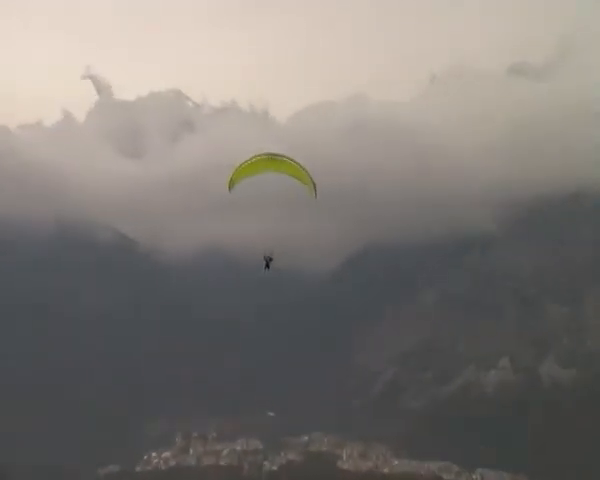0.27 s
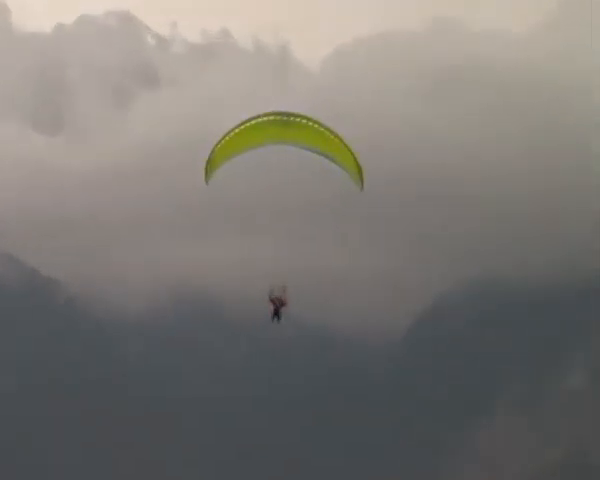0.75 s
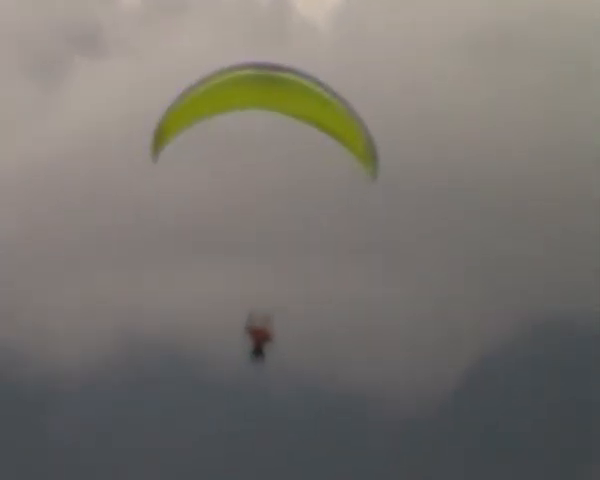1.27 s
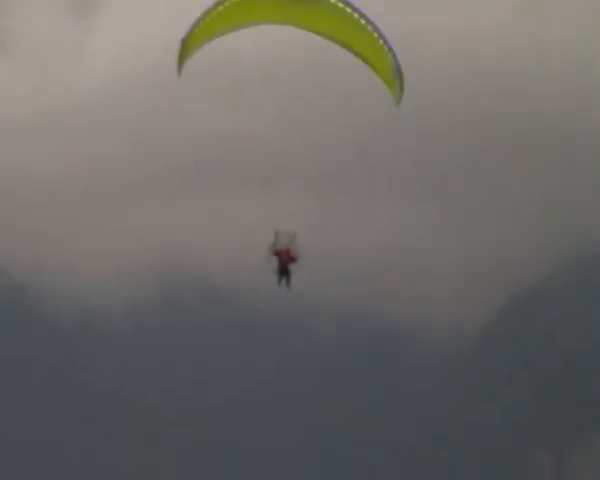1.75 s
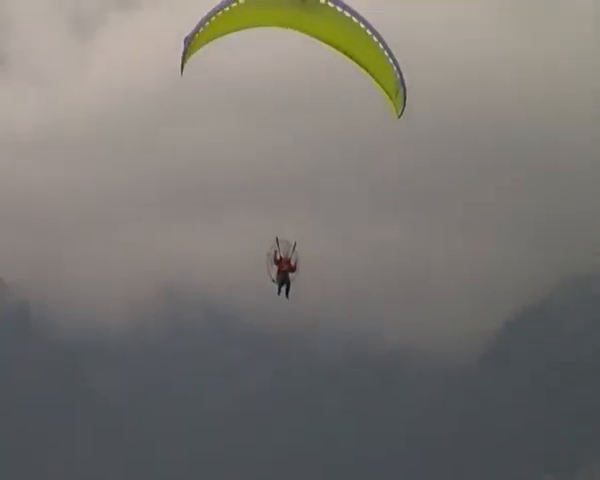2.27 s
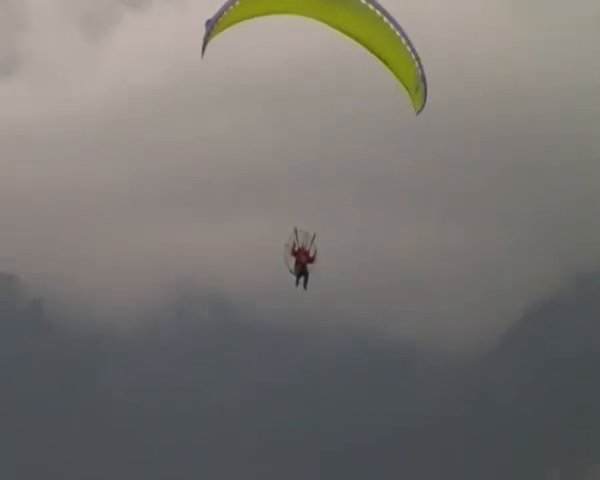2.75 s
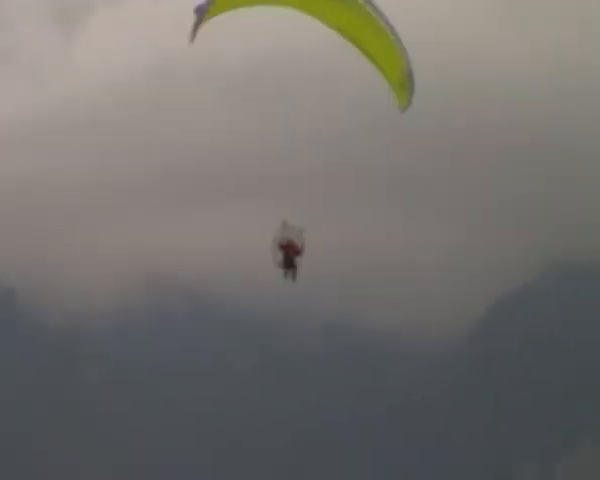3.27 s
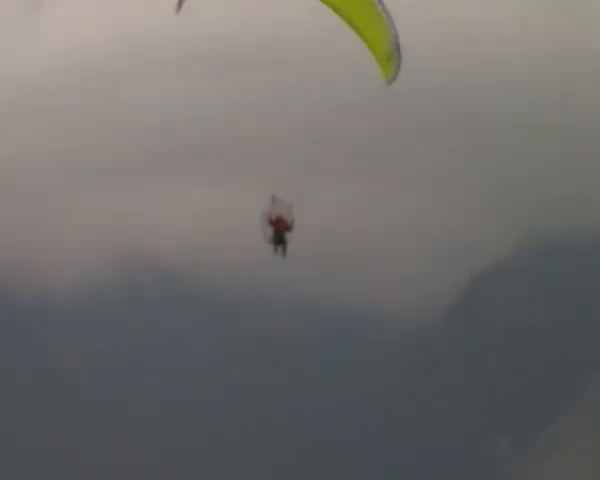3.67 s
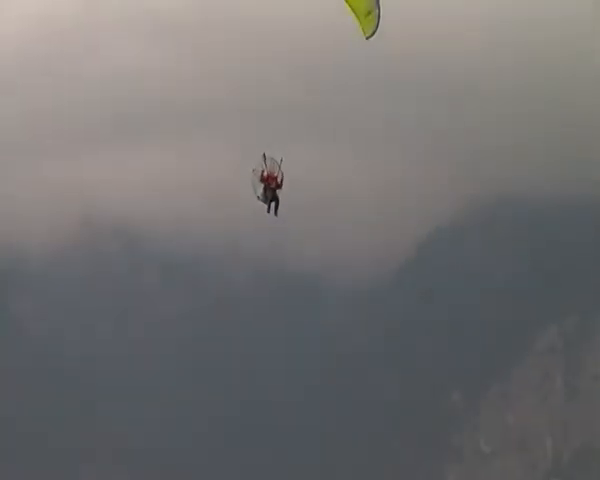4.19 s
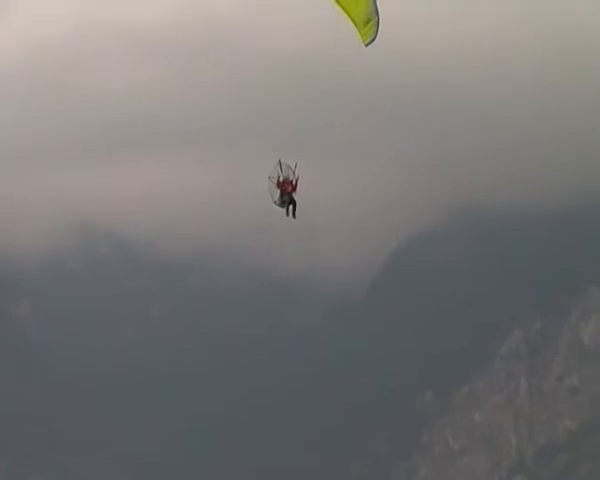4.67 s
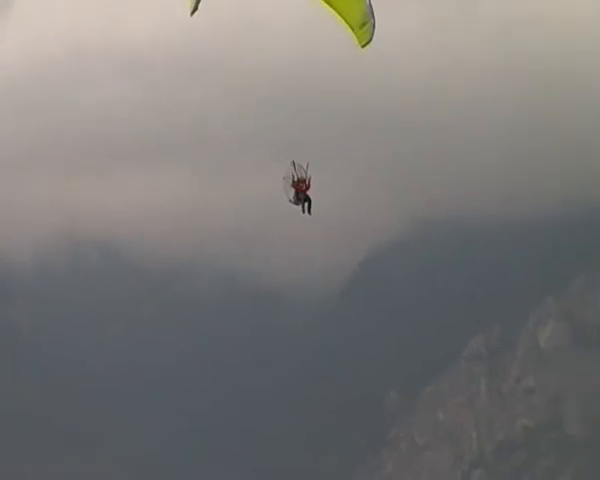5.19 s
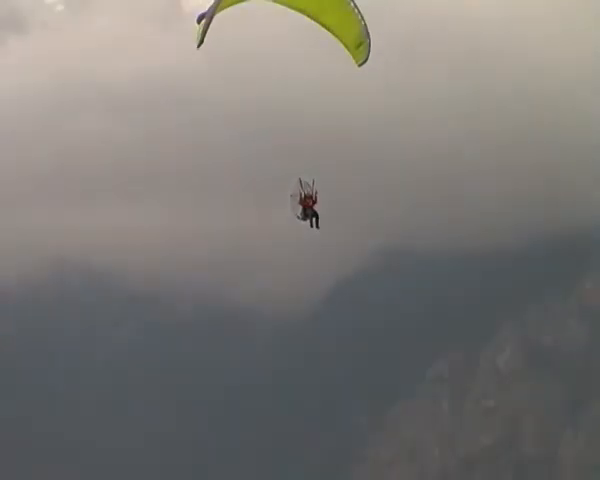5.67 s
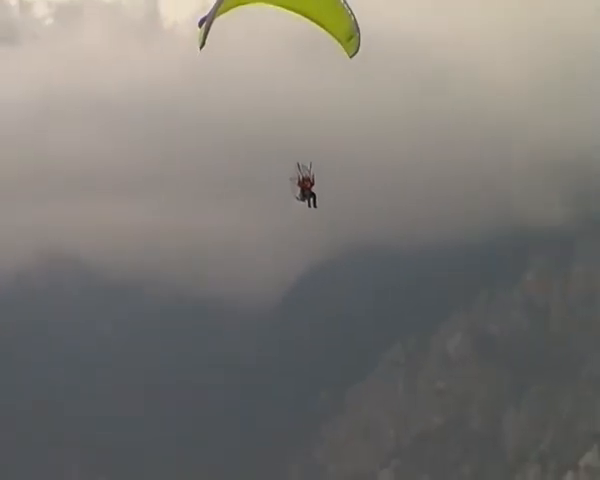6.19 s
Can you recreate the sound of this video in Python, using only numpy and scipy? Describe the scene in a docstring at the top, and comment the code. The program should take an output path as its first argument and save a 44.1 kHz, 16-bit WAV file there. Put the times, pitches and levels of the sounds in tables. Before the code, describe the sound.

Wind rumbles and ticks on a microphone as a paramotor's raspy engine drone approaches, surges loud, drops back and slowly sinks in pitch.

```python
"""On an open beach a paramotor flies towards and over two microphone ports, its pitch sinking slowly.
One pressure pulse per firing rings the two-stroke's silencer into a buzz and knocks its shell.
The geared propeller hums with thrust and rasps as its blades chop the wakes of pilot and frame.
Moving air makes the aircraft swell and fade; wind buffets the ports over the wash of the beach."""
import sys
import numpy as np
from scipy import signal
from scipy.fft import rfft, irfft, next_fast_len
from scipy.io import wavfile

SR = 44100
rng = np.random.default_rng(int(sys.argv[2]) if len(sys.argv) > 2 else 0)


def to_wav(s):
    """Save 16-bit WAV."""
    ch = np.atleast_2d(s).T  # columns
    pcm = np.round(np.clip(ch, -1, 1) * 32767)  # PCM
    wavfile.write(sys.argv[1], SR, pcm.astype(np.int16))


N = 283563  # samples
TOP_HZ = 10900  # upper limit of the microphone's band


def amp(db):
    """Decibels to gain."""
    return 10 ** (np.asarray(db) / 20)


def unit(x):
    """Scale to rms 1."""
    return x / np.sqrt(np.mean(x ** 2) + 1e-20)


def curves(rows):
    """One value per sample for each column after the time."""
    s, *columns = np.transpose(rows)
    t = np.arange(N) / SR
    return [np.interp(t, s, column) for column in columns]


def wobble(rate):
    """A random curve of rms 1 with rate knots a second."""
    knots = rng.standard_normal(int(N * rate / SR) + 2)
    return unit(np.interp(np.arange(N) * rate / SR, np.arange(len(knots)), knots))


def filtered(x, response):
    """x passed through a complex response of frequency, padded so that tails do not wrap round."""
    m = next_fast_len(N + 8192)
    return irfft(rfft(x, m) * response(np.fft.rfftfreq(m, 1 / SR)), m)[..., :N]


def coloured(x, spectrum):
    """x shaped by (freq_hz, level_db) points on a log frequency axis, at rms 1."""
    f, db = np.transpose(spectrum)
    return unit(filtered(x, lambda hz: amp(np.interp(np.log(hz + 1), np.log(f), db))))


def clicks(turns):
    """One click at every whole turn."""
    whole = np.floor(turns)
    return np.diff(whole, prepend=whole[0])


def struck(hits, spectrum, sweep_s):
    """Clicks ringing with a (freq_hz, level_db) spectrum, at rms 1; the highest treble trails by sweep_s."""
    f, db = np.transpose(spectrum)

    def response(hz):
        shape = np.log(amp(np.interp(np.log(hz + 1), np.log(f), db)))
        # the phase that lets the ring start at the click, never before it
        causal = np.conj(signal.hilbert(np.r_[shape, shape[-2:0:-1]]))[:len(hz)]
        return np.exp(causal - 1j * np.pi * sweep_s * hz ** 2 / TOP_HZ)
    return unit(filtered(hits, response))


# the wash of the beach: freq_hz, level_db (relative, per Hz)
SHORE_SPECTRUM = [(25, -8), (70, -1.5), (140, 8), (300, -3.5), (600, -0.5), (1500, -28), (4000, -31),
                  (7000, -29), (11000, -43)]


def shore(level_db):
    """The soft wash of the open beach: shaped noise, separate at each port, drifting slightly in level."""
    return amp(level_db + wobble(3.5)) * coloured(rng.standard_normal((2, N)), SHORE_SPECTRUM)


# the light breeze between gusts: time_s, level_db (relative, both ports together)
BREEZE_LEVEL = [(0, -39.5), (0.2, -35.5), (0.3, -35), (0.7, -37), (0.9, -35), (1.15, -44), (2.35, -42.5),
                (2.5, -55.5), (2.9, -43), (3.12, -39.5), (3.7, -37.5), (4.1, -37), (4.5, -36), (5.1, -38.5),
                (5.4, -38.5), (6.43, -38)]
BREEZE_LEFT_DB = 2  # lean to the left port
BREEZE_SWING_DB, BREEZE_SWINGS_PER_S = 3.5, 18  # depth and pace of its puffs
# moments when the breeze drops: middle_s
LULL_TIMES = [0.0, 0.191, 1.095, 1.185, 1.295, 1.425, 1.73, 3.135, 3.535, 3.785, 3.925]
LULL_DB, LULL_S = -8, 0.048  # depth and length of a lull
# gusts that swell and die: middle_s, length_s, peak_db (relative), left_minus_right_db
GUST_EVENTS = [(0.334, 0.02, -29.5, -6), (0.374, 0.026, -27.5, 18.5), (0.417, 0.019, -26.5, -8),
               (0.462, .05, -33, 5), (0.534, 0.035, -28, 18), (0.669, 0.076, -29.5, 5.5),
               (0.786, 0.04, -30.5, -0.5), (0.868, 0.041, -32, 5), (1.05, .04, -31, 10),
               (1.153, 0.022, -31, 2), (1.24, 0.036, -29, 1.5), (1.368, .06, -33, 7.5),
               (1.585, 0.18, -29, 12), (1.81, 0.044, -31.5, 17), (1.966, 0.055, -42, 12),
               (2.131, 0.041, -34.5, 6), (3.293, 0.24, -35.5, 9), (2.082, 0.092, -35, -13.5),
               (2.31, 0.21, -37, 17.5), (3.466, 0.046, -29, 1.5), (3.698, 0.085, -33, 7),
               (4.29, 0.021, -25.5, 19), (4.308, 0.21, -30, 16.5), (4.473, .05, -26, 12),
               (4.628, .13, -26.5, 4), (4.823, 0.14, -29.5, -7.5), (4.924, 0.024, -24.5, -6.5),
               (4.982, 0.18, -26.5, -5.5), (5.174, 0.18, -28.5, -20), (5.299, 0.032, -27, -16.5),
               (5.645, 0.33, -29.5, -7), (5.884, 0.12, -31.5, 14), (6.044, 0.18, -28.5, -7.5),
               (6.367, 0.095, -35, 19)]


def airflow(sign):
    """Wind at the left (+1) or right (-1) port: a puffing breeze with lulls, and bell-shaped gusts on top."""
    t = np.arange(N) / SR

    def share(left_db):
        return 1 / (1 + amp(-sign * left_db) ** 2)

    def bell(middle_s, length_s):
        return np.exp(-(2 * (t - middle_s) / length_s) ** 2)

    breeze_db, = curves(BREEZE_LEVEL)
    breeze_db = breeze_db + LULL_DB * sum(bell(s, LULL_S) for s in LULL_TIMES)
    puffs_db = BREEZE_SWING_DB * wobble(BREEZE_SWINGS_PER_S)
    power = share(BREEZE_LEFT_DB) * amp(breeze_db + puffs_db) ** 2
    for middle_s, length_s, peak_db, left_db in GUST_EVENTS:
        power = power + share(left_db) * amp(peak_db) ** 2 * bell(middle_s, length_s)
    return np.sqrt(power)


# wind rumble at a port: freq_hz, breeze_db (relative, per Hz), hard_gust_db (relative, per Hz)
BUFFET_SPECTRA = [(15, -52.5, -60), (28, -18, -37.5), (55, -2, -38.5), (113, 3.5, -6), (204, -2, 1),
                  (323, -9.5, -2.5), (490, -26.5, -8.5), (764, -31.5, -17), (1260, -35.5, -25.5),
                  (2040, -59.5, -34.5), (5000, -58, -62), (11000, -64, -67.5)]
# ticking of eddies at a port: freq_hz, level_db (relative, per Hz)
CRACKLE_SPECTRUM = [(100, -16), (400, 10.5), (1500, -2.5), (4000, -7.5), (8000, -14.5), (11000, -17)]


def wind(lumps_db, crackle_db, spiky_db):
    """Eddies hit each microphone port separately; harder gusts are brighter, steadier and crackle louder."""
    breeze_spectrum = np.array(BUFFET_SPECTRA)[:, [0, 1]]
    gust_spectrum = np.array(BUFFET_SPECTRA)[:, [0, 2]]
    pair = []
    for sign in (1, -1):
        pressure = amp(8) * airflow(sign)
        force = pressure ** 2 / (pressure ** 2 + amp(-26.0) ** 2)  # 0 breeze, 1 hard gust
        eddies = amp(lumps_db * (1 - 0.6 * force) * wobble(45))  # a hard gust blows more evenly
        air = eddies * rng.standard_normal(N)
        soft = (1 - force) * coloured(air, breeze_spectrum)
        hard = force * amp(1) * coloured(air, gust_spectrum)
        spikes = amp(spiky_db * wobble(500)) * rng.standard_normal(N)
        crackle = coloured(eddies * spikes, CRACKLE_SPECTRUM)
        pair.append(pressure * (soft + hard + amp(crackle_db) * crackle))
    return np.array(pair)


# sharp flicks of wind at the ports: start_s (the peak is width_s later), peak_db (before level_db is added)
FLICK_EVENTS = [(0.327, -41.5), (0.4157, -41), (0.882, -40), (1.055, -38.5), (1.231, -41), (1.256, -40.5),
                (1.389, -38), (1.6273, -39), (3.748, -37.5), (3.832, -40.5), (3.856, -46), (3.8846, -41),
                (4.2868, -40), (4.4723, -41.5), (5.393, -37.5), (5.467, -40.5)]


def flicks(level_db, width_s):
    """Brief ticks that swell and die as a sharp eddy snaps across the ports."""
    t = np.arange(N) / SR
    envelope = 0
    for start_s, peak_db in FLICK_EVENTS:
        envelope = envelope + amp(peak_db + level_db) * np.exp(-np.abs(t - start_s - width_s) / width_s)
    return envelope * coloured(rng.standard_normal((2, N)), CRACKLE_SPECTRUM)


# how the microphone sees the engine: time_s, view (0 from the front, .5 at a slant, 1 from the side);
# the exhaust and the propeller follow it too
ASPECT_VIEW = [(0, 0.024), (1.5, 0.01), (2.8, 0.6), (3.6, 0.42), (4.2, 0.58), (4.7, 0.65), (5.5, 0.79),
               (6.43, 0.79)]
# ringing modes of the silencer's metal shell: freq_hz, width_hz, level_db (relative)
SHELL_MODES = [(2950, 60, -4), (3190, 100, 1), (4530, 110, -8), (4950, 150, -15)]


def shell(turns, knock_db, rattle_db, rattle_cycles):
    """Every firing knocks the silencer's metal shell and rattles it briefly; this is heard from the side."""
    side, = curves(ASPECT_VIEW)

    def modes(f):
        total = 0
        for c, w, db in SHELL_MODES:
            total = total + amp(db) * 1j * f * w / (c * c - f * f + 1j * f * w)
        return total * (f > SHELL_MODES[0][0] / 2)  # nothing far below the lowest mode

    knock = unit(filtered(clicks(turns), modes))
    rattling = np.exp(-(turns % 1) / rattle_cycles) * rng.standard_normal(N)
    rattle = unit(filtered(rattling, modes))
    return side ** 3 * (amp(knock_db) * knock + amp(rattle_db) * rattle)


# the silencer's note, one row per order from the first up: front_db, slant_db, side_db (all relative)
PIPE_ORDERS = [(-28.5, -28.5, -26.5), (-37, -27.5, -11.5), (-27.5, -25.5, -23.5), (-14, -21.5, -16),
               (-10, -7.5, -4.5), (-2.5, 0, -0.5), (-8, -12.5, -11.5), (-13, -14.5, -5.5),
               (-18, -18.5, -10), (-12, -7.5, -4), (-15.5, -9.5, -3.5), (-15, -11.5, -4), (-16, -23, -11.5),
               (-18, -28.5, -8), (-33.5, -36.5, -25), (-18.5, -23.5, -14), (-32, -32.5, -24.5),
               (-34, -31, -31)]
FAR_FLUTTER_S = 0.91  # how fast the disturbance of the long, low path at the start fades


def exhaust(turns, flicker_db, rough, jitter, smear, scatter):
    """One pressure pulse per firing rings the silencer; its orders radiate differently to front and side."""
    side, = curves(ASPECT_VIEW)
    far = np.exp(-np.arange(N) / SR / FAR_FLUTTER_S)
    side_db = np.array(PIPE_ORDERS)[:, -1]
    orders = np.arange(len(PIPE_ORDERS)) + 1
    # a causal pipe: each order's phase follows from the shape of the spectrum
    shape = np.interp(np.abs(np.arange(-32, 32)), orders, np.log(amp(side_db)))
    phases = -signal.hilbert(np.fft.ifftshift(shape)).imag
    uneven = turns + jitter * wobble(130)  # no two firings are timed alike
    stray = scatter * far  # over the long path, eddies fray each order on its own
    note = np.zeros(N)
    for k, views_db in zip(orders, PIPE_ORDERS):
        level_db = np.interp(side, [0, .5, 1], views_db) + flicker_db * (1 - side) * wobble(8.2)
        # from the front, the pilot's body smears the pulse
        detour = smear * (1 - side) * rng.uniform(-np.pi, np.pi)
        angle = 2 * np.pi * k * uneven + phases[k] + detour
        in_step = (1 + stray * wobble(50)) * np.cos(angle)
        out_of_step = stray * wobble(50) * np.sin(angle)
        note += amp(level_db) * (in_step + out_of_step)
    return note * (1 + rough * wobble(130))


# thrust hum: multiple (of the blade rate), level_db (relative)
THRUST_HUM = [(1, -15.5), (2, -9), (3, -3.5), (4, -1.5), (5, -6), (6, -11), (8, -4), (9, -1)]
HUM_FRONT_DB = 4  # the hum is this much stronger from straight ahead
# wakes that each blade cuts: place (in the blade cycle, 0-1), width (cycles)
WAKE_PLACES = [(0.308, 0.022), (0.44, 0.022), (0.935, 0.035)]
# each wake beams its own way, so they take turns as the aircraft passes:
# time_s, first_db, second_db, third_db (relative)
WAKE_BEAMS = [(0, -7, 1, -5), (0.9, -5, 2, -6), (1.7, -12, 2, -4), (2.15, -8, 5, -4), (2.4, -1, 6, -3),
              (3.1, 3, 4, -1), (4.2, 4.5, 2.5, -1), (4.8, -1, 1, -4), (6.43, -4, 0, -3)]
# slap of a blade cutting a wake: freq_hz, level_db (relative)
SLAP_SPECTRUM = [(150, -34.5), (430, -8), (560, -5.5), (680, 1.5), (800, 5), (930, 1), (1120, -0.5),
                 (1300, 2), (1650, 0.5), (1900, -4), (2150, -4.5), (2420, -1), (2700, -15), (2950, -9),
                 (3250, -10.5), (3550, -20.5), (4000, -15.5), (5000, -28.5), (8000, -43), (11000, -66)]
# turbulent rasp of the blades: freq_hz, level_db (relative, per Hz)
SWISH_SPECTRUM = [(60, -30), (220, -2), (420, -3.5), (530, -3), (620, 4), (760, 3), (950, -2), (1550, 1.5),
                  (1750, -2.5), (1900, -2.5), (2150, -1.5), (2480, 0.5), (2780, -6), (2980, -2.5),
                  (3230, -3.5), (3560, -10), (3800, -9.5), (4150, -10.5), (4600, -17), (4950, -16),
                  (5300, -22), (5800, -24.5), (8500, -35), (10000, -50), (10900, -81)]


def propeller(passes, hum_db, slap_db, rasp_db, between_db, scatter_db, spread_db, spread_hz):
    """Blades hum with thrust; every wake they cut gives a sharp slap and a burst of fresh turbulence."""
    side, = curves(ASPECT_VIEW)
    hum = 0
    for multiple, db in THRUST_HUM:
        hum = hum + amp(db) * np.sin(2 * np.pi * (round(multiple) * passes + rng.random()))
    hum = unit(hum)
    cuts, power, mean_power = 0, amp(between_db) ** 2, amp(between_db) ** 2
    for (place, width), db in zip(WAKE_PLACES, curves(WAKE_BEAMS)):
        offset = (passes - place + .5) % 1 - .5  # cycles from the middle of the wake
        bump = np.exp(-.5 * (offset / width) ** 2)
        strength = amp(db + scatter_db * wobble(70))  # no two cuts are equally hard
        cuts = cuts + strength * clicks(passes - place + width)  # the slap comes as the blade enters the wake
        power = power + strength ** 2 * bump
        mean_power = mean_power + amp(db) ** 2 * bump.mean()
    slaps = struck(cuts / np.sqrt(mean_power), SLAP_SPECTRUM, sweep_s=.0015)
    burst = np.sqrt(power / mean_power)
    # turbulence is new at every pass, and its treble differs from port to port
    shared = burst * rng.standard_normal(N)
    own = filtered(rng.standard_normal((2, N)),
                   lambda hz: amp(spread_db) * hz ** 4 / (hz ** 4 + spread_hz ** 4))
    rasp = coloured(shared + np.sqrt(burst) * own, SWISH_SPECTRUM)
    hum_gain = amp(hum_db + HUM_FRONT_DB * (1 - side) ** 2)
    return hum_gain * hum + amp(slap_db) * slaps + amp(rasp_db) * rasp


def ports(x, lead_s, right_db):
    """The right port hears lead_s earlier, and gets more treble: right_db at 2500 Hz, rising above."""
    sign = np.array([[-1], [1]])  # left, right
    return filtered(x, lambda hz: np.exp(1j * np.pi * hz * lead_s * sign)
                    * amp(sign * right_db / 2 * hz / 2500))


# firing rate as heard: time_s, pitch_hz
FIRING_PITCH = [(0, 135.48), (0.7, 135.3), (1.15, 134.75), (1.9, 134.31), (2.4, 134.19), (2.8, 133.94),
                (3.1, 133.4), (3.6, 132.51), (3.95, 132.15), (4.3, 130.97), (4.6, 131.08), (4.9, 130.96),
                (5.3, 129.82), (5.7, 128.9), (6.0, 128.61), (6.43, 128.44)]
BLADE_RATIO = .55  # blade passes per firing
# how loud the aircraft arrives through the moving air: time_s, level_db (relative)
AIR_LOUDNESS = [(0.0, -42), (0.07, -29), (0.16, -41.5), (0.25, -32.5), (0.27, -37.5), (0.37, -33.5),
                (0.45, -43.5), (0.46, -38.5), (0.53, -38.5), (0.86, -29), (0.9, -35), (0.95, -33),
                (1.11, -33), (1.23, -29), (1.29, -36.5), (1.36, -29), (1.43, -33), (1.55, -22.5),
                (1.58, -28), (1.7, -32.5), (1.79, -25), (1.87, -25.5), (1.92, -22), (1.97, -24),
                (2.02, -17), (2.05, -26), (2.11, -22), (2.18, -25), (2.34, -23), (2.41, -27), (2.47, -20),
                (2.55, -18.5), (2.59, -16.5), (2.81, -18), (2.86, -20.5), (2.91, -16), (2.94, -22.5),
                (3.03, -17.5), (3.15, -31.5), (3.25, -25.5), (3.33, -29), (3.4, -25.5), (3.54, -28.5),
                (3.61, -24.5), (3.74, -25), (3.77, -36.5), (3.83, -29.5), (3.92, -33), (3.99, -26.5),
                (4.09, -28.5), (4.15, -23.5), (4.31, -31), (4.35, -35), (4.65, -32), (4.68, -35.5),
                (5.31, -36.5), (5.38, -29.5), (5.42, -37), (5.58, -32.5), (5.63, -35), (5.74, -28.5),
                (5.78, -32), (6.4, -23.5), (6.42, -24.5)]
EXHAUST_DB, BLADES_DB = 0.74, -11.5  # each source relative to that loudness
NEAR_DB = -17.5  # loudness at which the growth and treble settings below are reckoned
EXHAUST_GROWTH = 0.092  # extra dB of the beamed exhaust note per dB of loudness
CLEAR_DB, CLEAR_HZ = -16.5, 2400  # extra blade treble at NEAR_DB, where the air carries the sound best
FAR_FLUTTER_DB, FLUTTER_DB = 0.9, 0.76  # extra flutter depth at the start, lasting depth
# blades against the engine, weakest as the plane of the disc sweeps past: time_s, level_db (relative)
BLADE_BALANCE = [(0, 1), (0.8, 1), (1.05, 2), (1.6, -2.5), (2, -0.5), (2.13, 0), (2.6, 0), (3.2, 0.7),
                 (3.75, -1), (3.95, -3), (4.2, -4), (4.4, -1), (4.7, -2), (5.0, -9), (5.15, -9), (5.35, -2),
                 (5.6, -2), (5.75, -3.5), (5.9, -1), (6.22, 0), (6.43, -3)]
# bright hiss of the blades, which comes and goes as the aircraft passes: time_s, level_db (relative)
HISS_LEVEL = [(0, -6), (1.3, -17), (1.7, -36), (2.4, -8), (3.7, -19.5), (4.15, 3), (4.6, -11), (5.2, -3),
              (5.8, -14), (6.02, -2), (6.13, -12), (6.22, -3), (6.3, -18), (6.43, -32)]


def paramotor(hiss_hz, hiss_octaves):
    """Engine and propeller share one shaft speed and one path through the air, which swells and flutters both."""
    rate, = curves(FIRING_PITCH)
    hiss_db, = curves(HISS_LEVEL)
    loud_db, = curves(AIR_LOUDNESS)
    blade_db, = curves(BLADE_BALANCE)
    t = np.arange(N) / SR
    turns = np.cumsum(rate * (1 + 0.00079 * wobble(14))) / SR  # firings so far
    # scatter: share of the exhaust note that the far air scatters
    note = exhaust(turns, flicker_db=1.3, rough=0.12, jitter=0.0019, smear=0.38, scatter=.75)
    engine = amp(EXHAUST_DB + EXHAUST_GROWTH * (loud_db - NEAR_DB)) * note
    engine = engine + shell(turns, knock_db=-14, rattle_db=-21, rattle_cycles=.12)
    # between_db: blade turbulence in clean air, relative to a wake
    blades = propeller(BLADE_RATIO * turns, hum_db=-0.5, slap_db=2.0, rasp_db=3.6, between_db=-2.2,
                       scatter_db=1.6, spread_db=8, spread_hz=6000)
    blades = amp(BLADES_DB + blade_db) * blades
    # at some angles the blades give a brighter hiss
    hiss = filtered(blades, lambda hz: np.exp(-(np.log2((hz + 1) / hiss_hz) / hiss_octaves) ** 2))
    blades = blades + amp(hiss_db) * hiss
    treble = filtered(blades, lambda hz: hz ** 4 / (hz ** 4 + CLEAR_HZ ** 4))
    blades = blades + amp(CLEAR_DB + loud_db - NEAR_DB) * treble
    # the long, low path at the start flutters most
    flutter_db = (FLUTTER_DB + FAR_FLUTTER_DB * np.exp(-t / FAR_FLUTTER_S)) * wobble(40)
    return ports(amp(loud_db + flutter_db) * (engine + blades), lead_s=5.1e-5, right_db=0.8)


def scene():
    """The aircraft above the beach, with wind on the microphone ports."""
    beach = shore(level_db=-42.0)
    gusts = wind(lumps_db=2.8, crackle_db=-27.5, spiky_db=7.5)
    snaps = flicks(level_db=6.5, width_s=0.0023)
    aircraft = paramotor(hiss_hz=4900, hiss_octaves=0.34)
    return beach + gusts + snaps + aircraft


def record(dry):
    """The microphone keeps nothing above its band limit."""
    return filtered(dry, lambda hz: hz < TOP_HZ)


dry = scene()
out = record(dry)
to_wav(out)
```